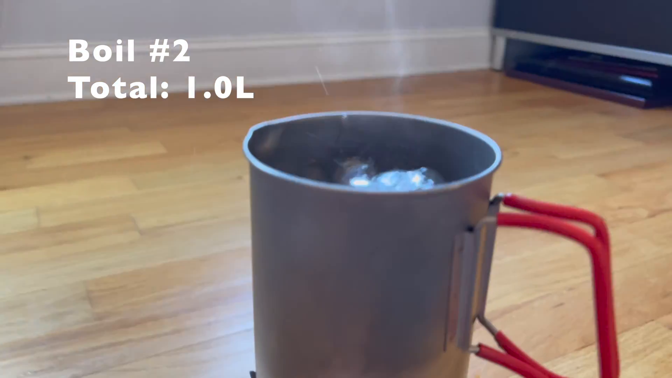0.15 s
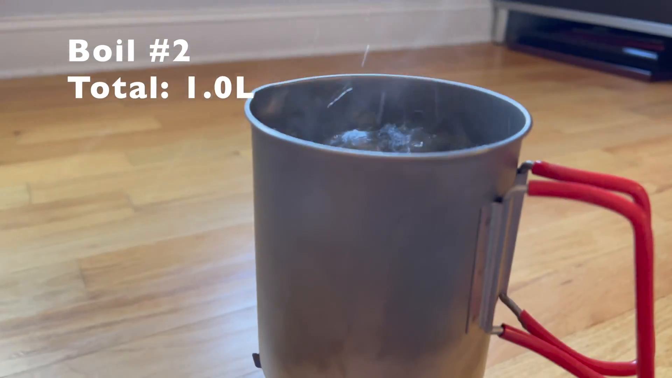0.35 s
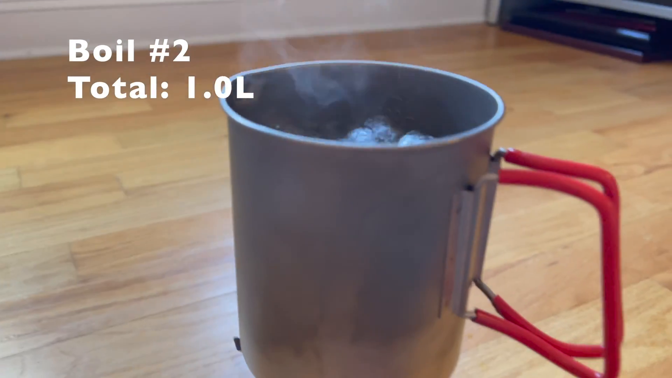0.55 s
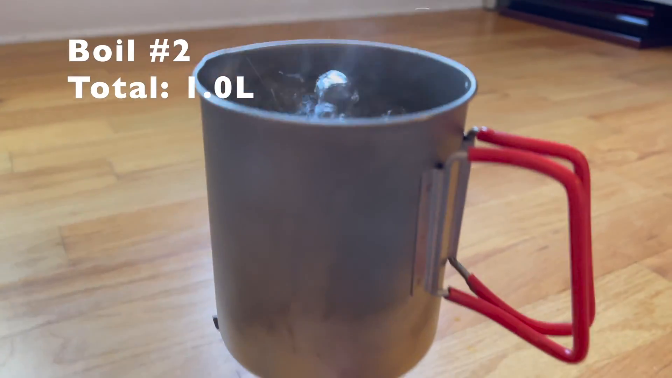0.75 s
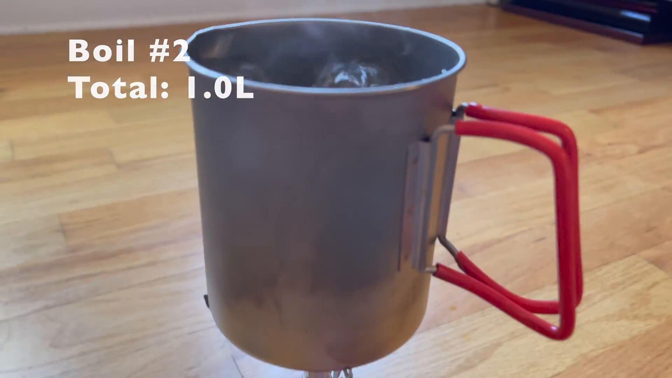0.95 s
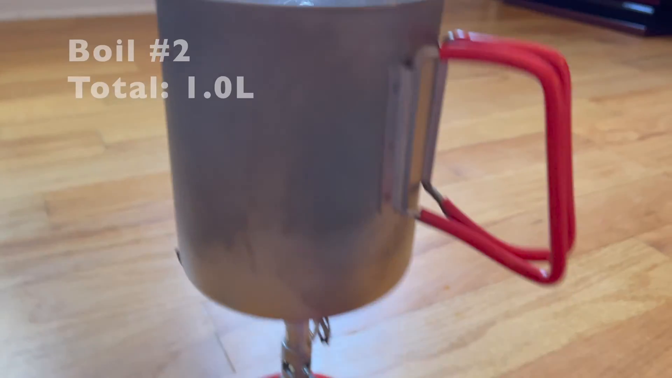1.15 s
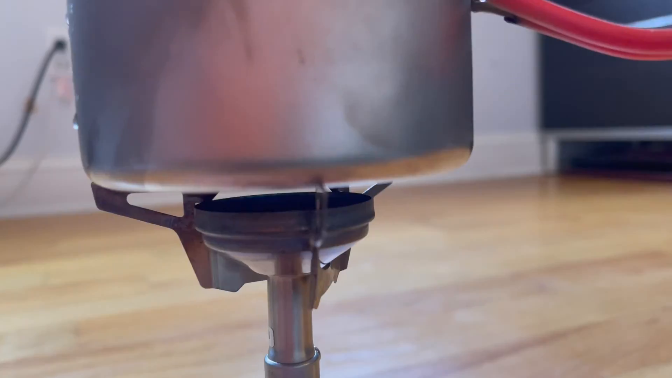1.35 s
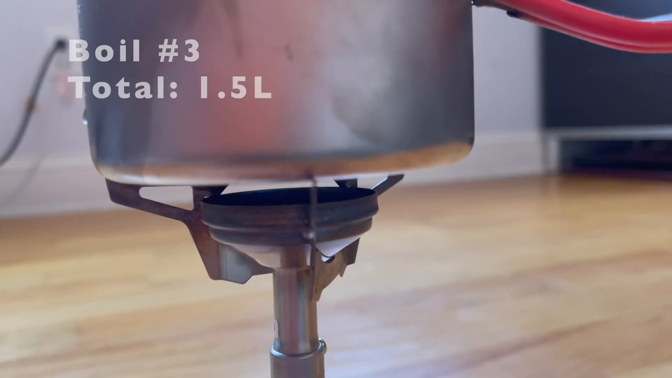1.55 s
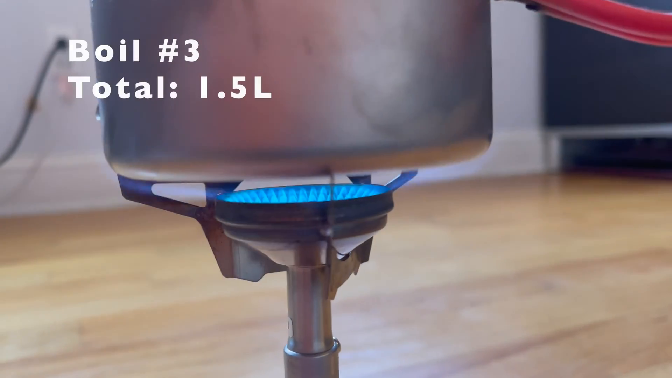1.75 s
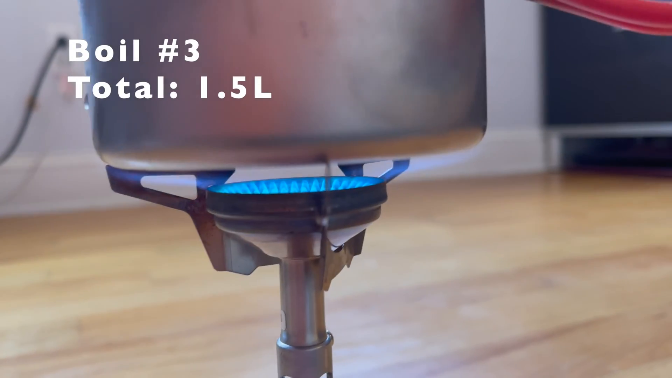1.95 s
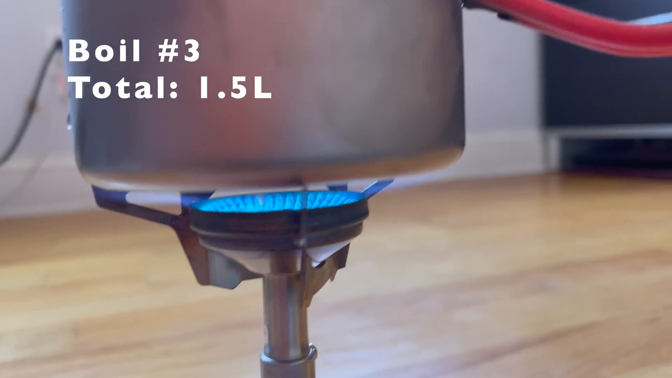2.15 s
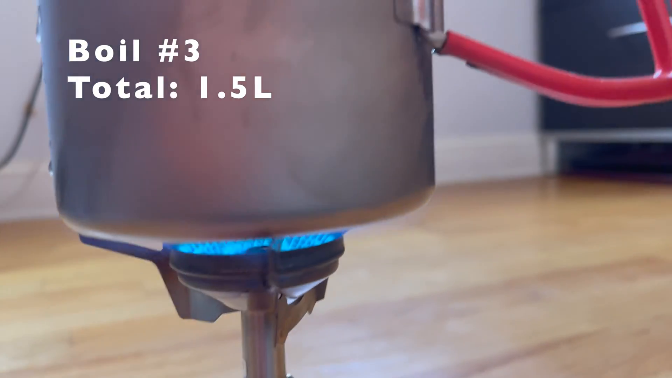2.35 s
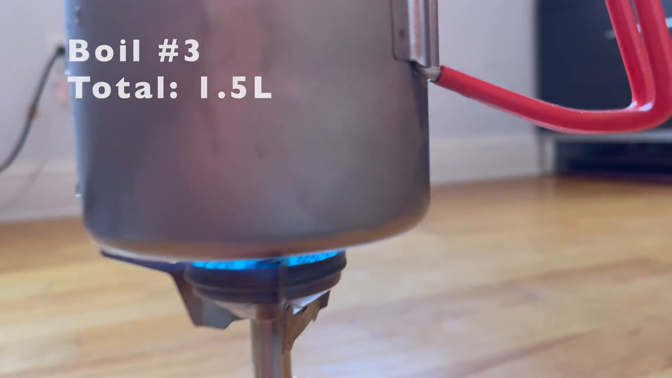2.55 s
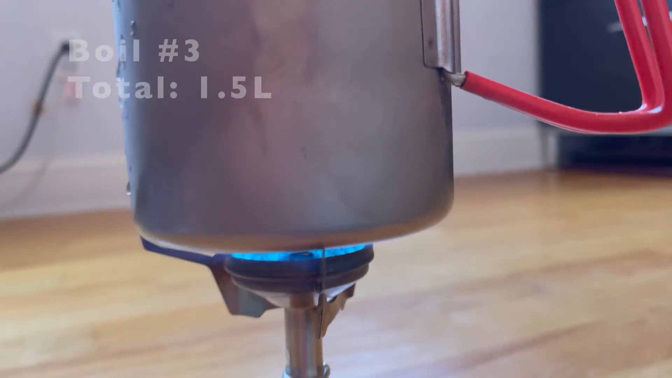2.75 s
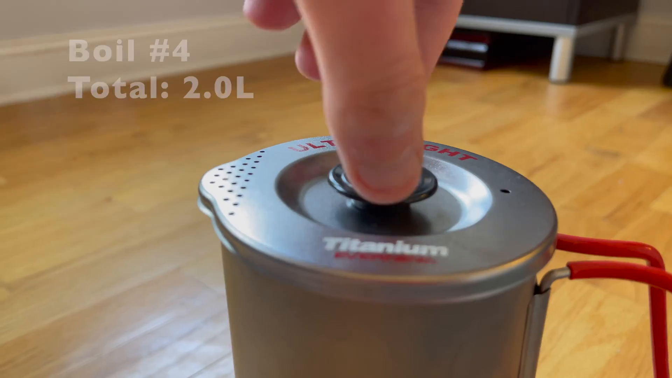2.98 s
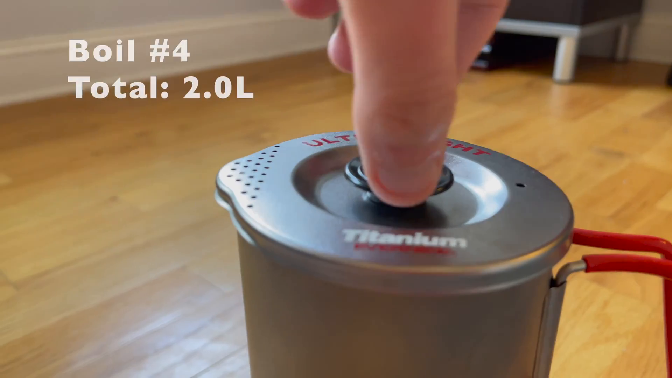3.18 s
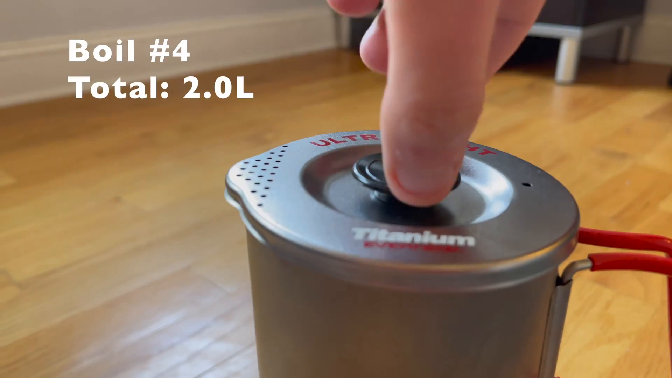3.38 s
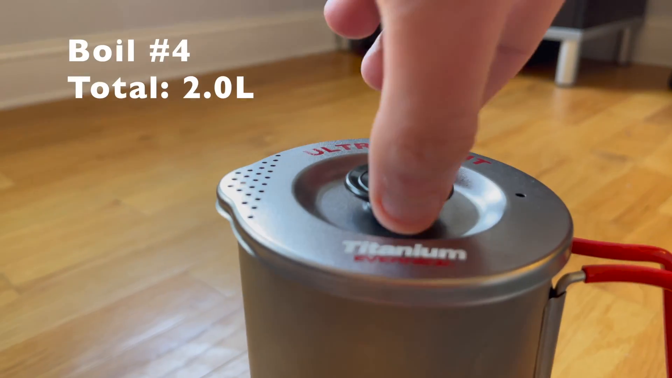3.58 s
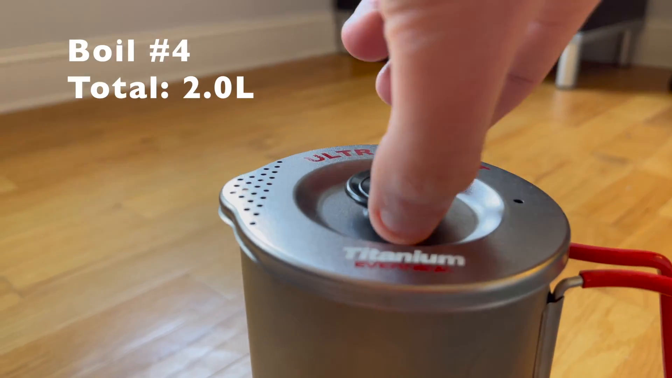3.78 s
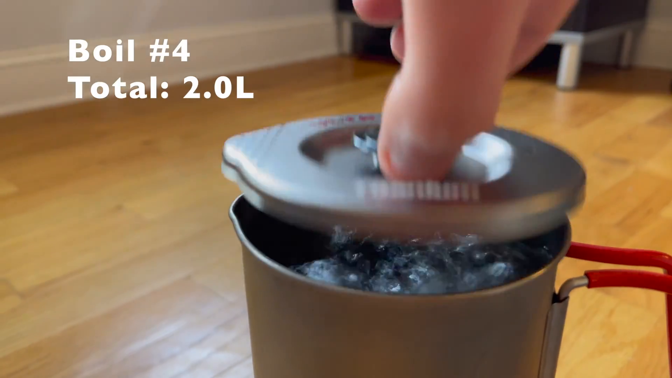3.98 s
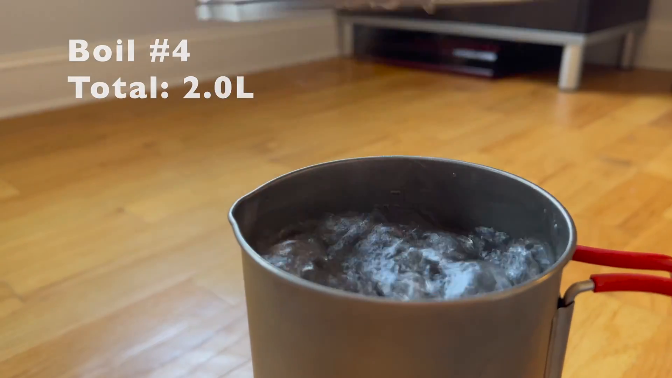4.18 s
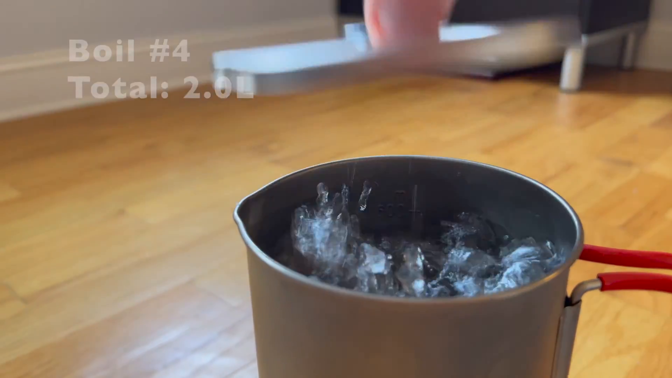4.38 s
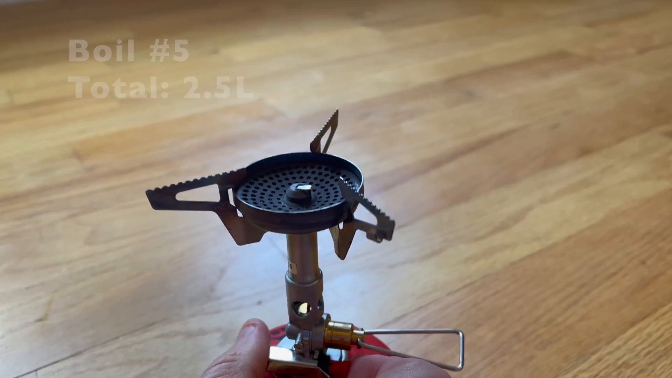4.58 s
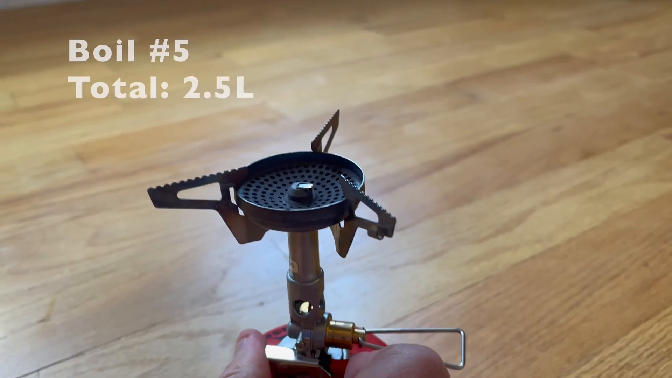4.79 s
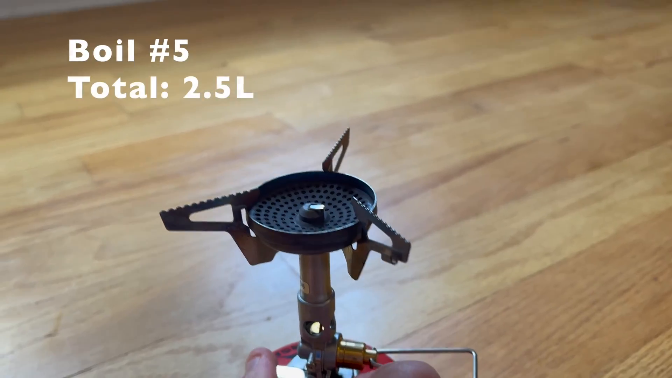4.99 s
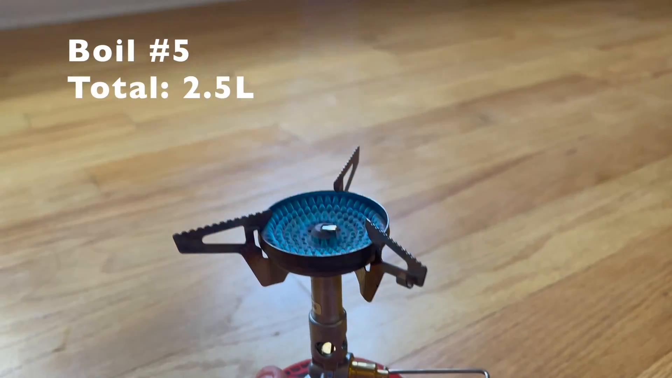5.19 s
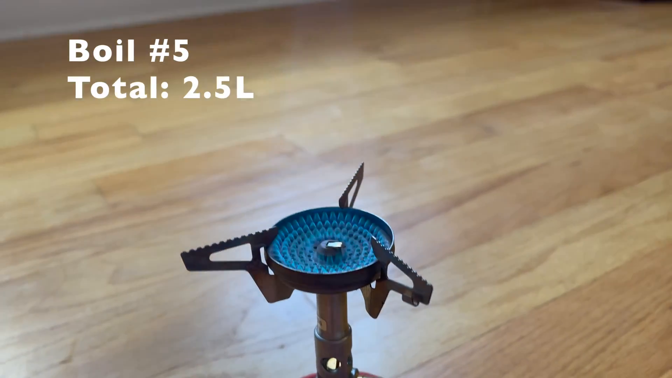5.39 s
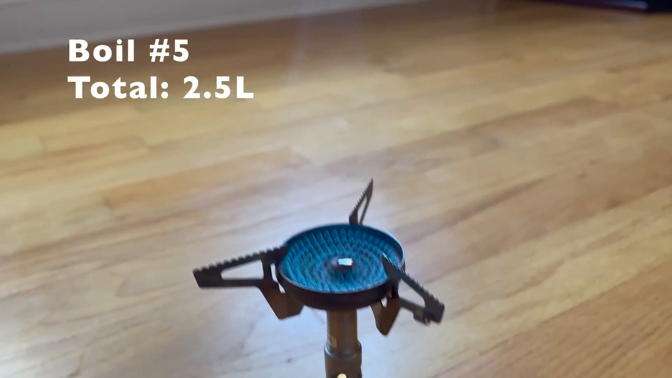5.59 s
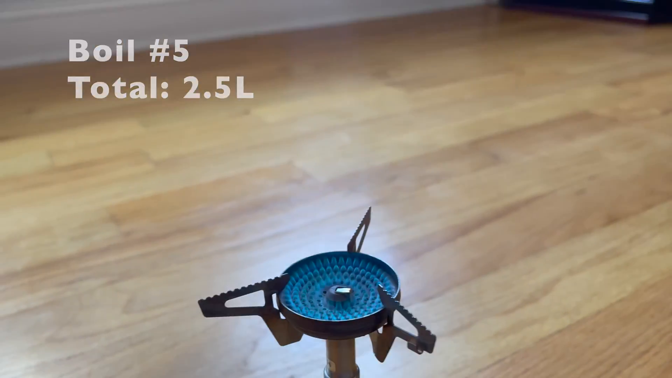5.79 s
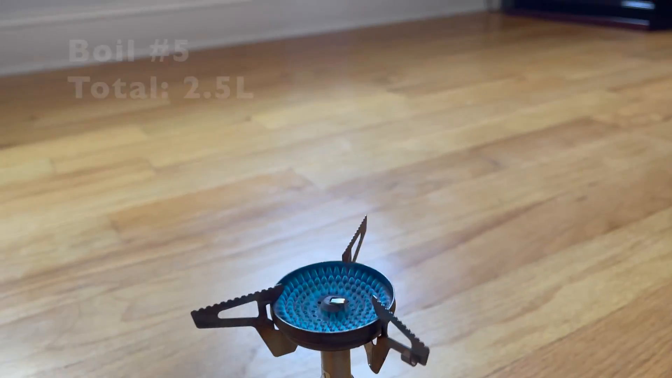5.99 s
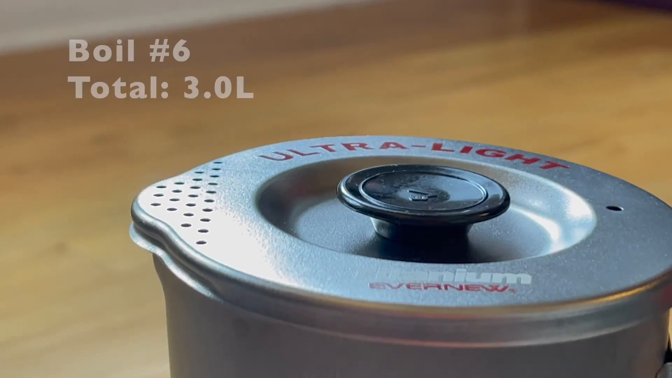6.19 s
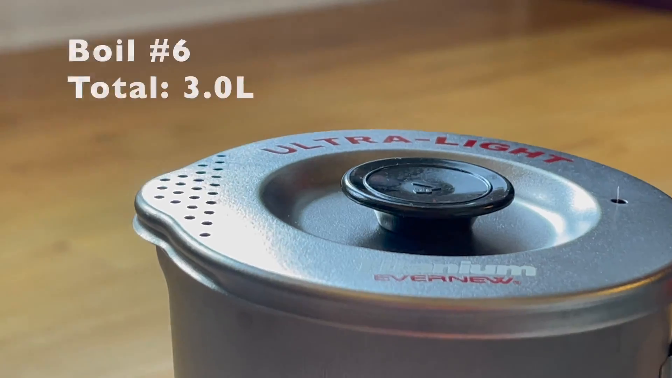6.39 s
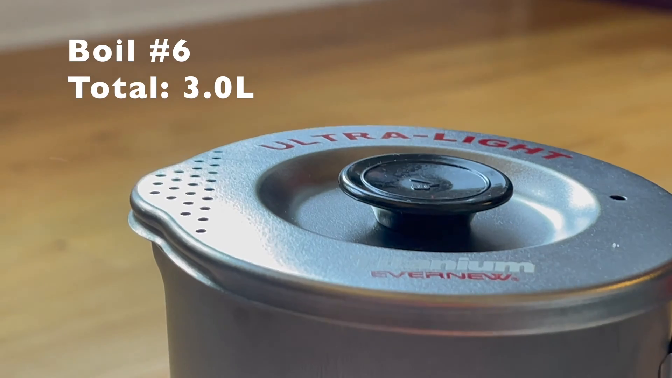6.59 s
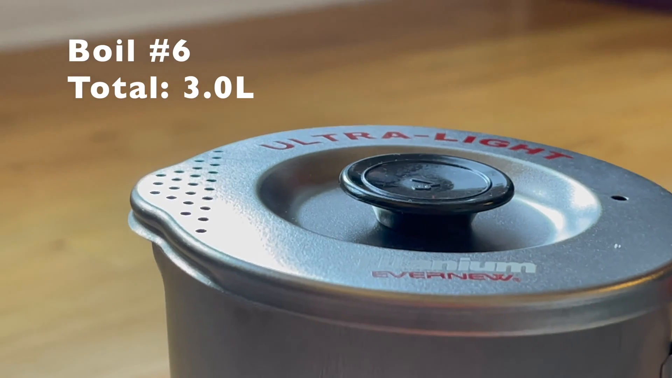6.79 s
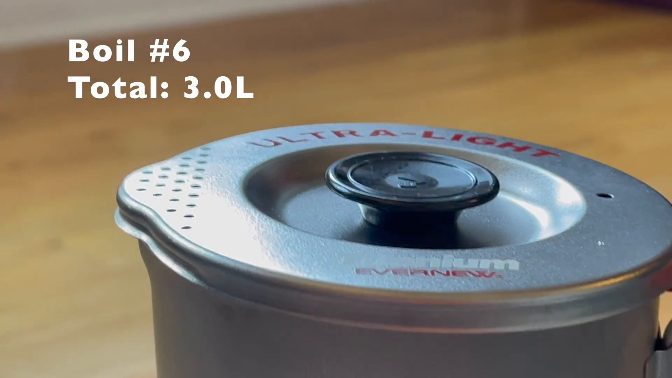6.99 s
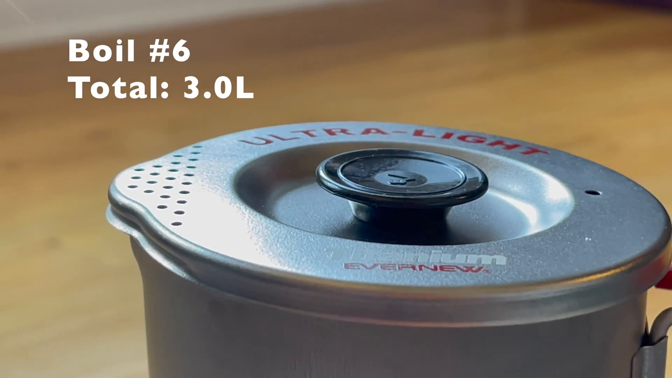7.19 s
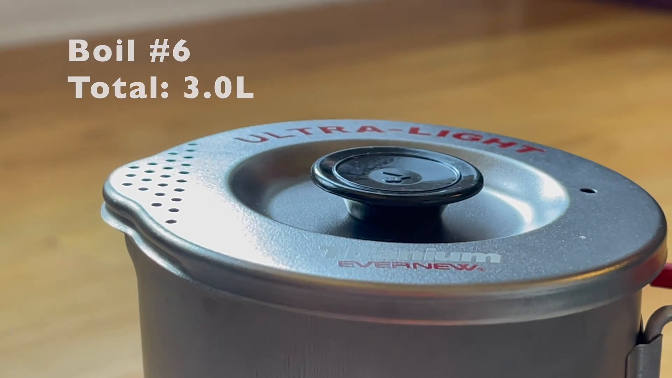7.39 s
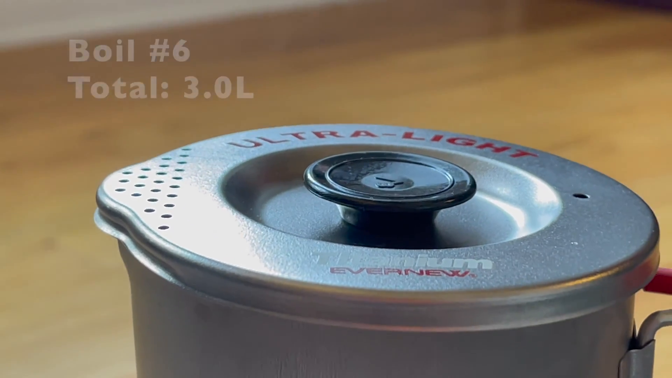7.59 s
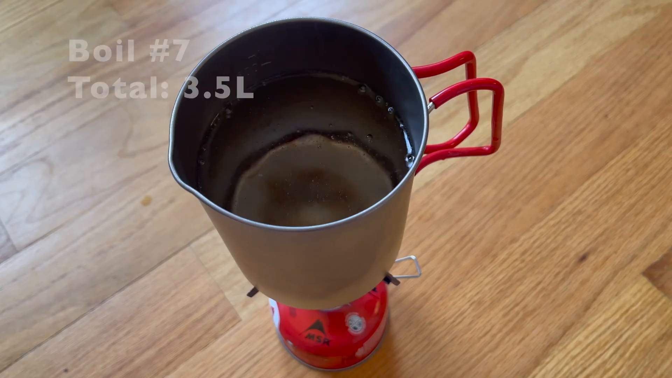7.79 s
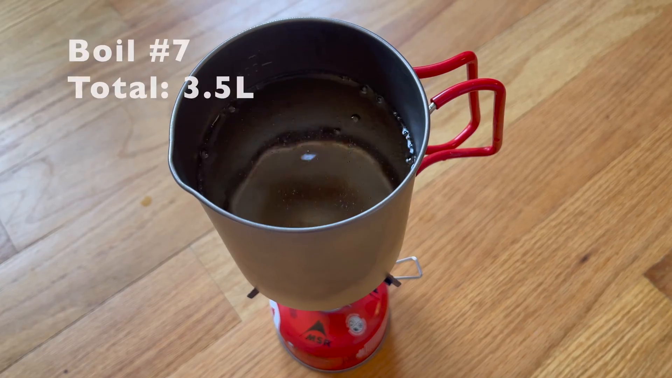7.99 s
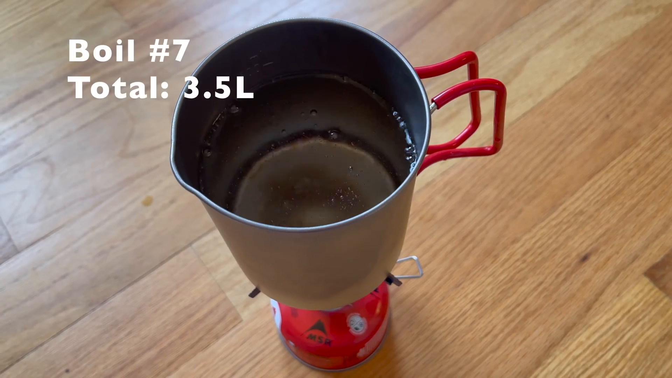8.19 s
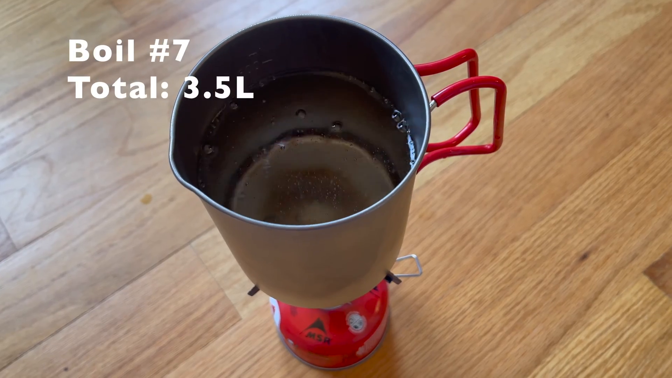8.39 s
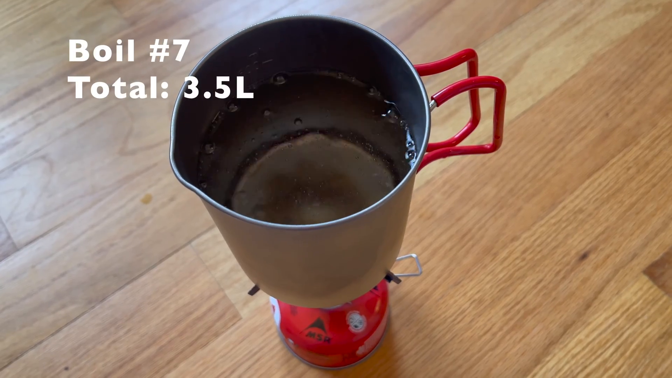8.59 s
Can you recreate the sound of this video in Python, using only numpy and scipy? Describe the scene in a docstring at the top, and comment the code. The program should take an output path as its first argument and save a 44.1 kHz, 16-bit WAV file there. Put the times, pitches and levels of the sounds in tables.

```python
"""A canister stove on a wooden floor indoors, in six short shots cut together.
Water boils over a rumbling flame while a metal ring dies away; gas hisses under a pot until the igniter
snaps and it catches with a whump; a rolling boil splashes; a bare burner lights; two more boils follow.
Flame and gas are coloured noise, bubbles and struck metal are decaying tones, snaps are coloured clicks
answered by the room."""
import sys
import numpy as np
from scipy import signal
from scipy.fft import rfft, irfft, next_fast_len
from scipy.io import wavfile

SR = 44100
rng = np.random.default_rng(int(sys.argv[2]) if len(sys.argv) > 2 else 0)


def int16_out(signal):
    """Quantize to a 16-bit WAV file."""
    q = np.round(np.clip(np.atleast_2d(signal).T, -1, 1) * 32767)
    wavfile.write(sys.argv[1], SR, q.astype(np.int16))


N = 381465
TIME = np.arange(N) / SR
SIZE = 2 * next_fast_len(N // 2 + 8192, real=True)
FREQS = np.maximum(np.arange(SIZE // 2 + 1) * SR / SIZE, 1)

# Levels are relative: later gains and filters apply.
# Room rumble: f/Hz, level/dB per Hz
ROOM_FLOOR = [(20, -93), (55, -79.5), (110, -79), (170, -86.5), (250, -90), (450, -104), (2000, -115)]
# Mains hum: f/Hz, level/dB
HUM = [(59.5, -57.5), (119, -70)]
# Side against mid (general, lidded pot, burner seen close): f/Hz, level/dB
SPREAD = [(60, -21), (200, -18), (450, -8), (900, -3), (1700, 0), (3200, -0.5), (5000, -3.5), (6300, -8),
          (7300, -0.5), (8400, -8), (10000, -50)]
LIDDED_SPREAD = [(60, -23), (200, -21.5), (500, -12), (1500, -5.5), (2400, -21), (3300, -10), (4500, -40),
                 (6000, -56)]
BURNER_SPREAD = [(60, -29), (200, -16.5), (450, -10), (1000, -6), (2000, -5.5), (3200, 2), (4800, -20),
                 (6200, -11), (7300, 2), (8400, -14), (10000, -39)]
# Overall tone of the sound, a bright peak near 11 kHz, little above 13 kHz: f/Hz, level/dB
OVERALL_TONE = [(20, -28), (48, -0.5), (9500, -0.5), (10300, 1), (11100, 6.5), (11900, -0.5), (12900, -4.5),
                (13500, -26), (16000, -24)]
CUTOFF_HZ = 15800
SWELL_S, SWELL_DEPTH_DB = 0.25, 23.5   # boil and room tone swell in

# Modes of ringing thin metal: f/Hz, level/dB, t60/s
METAL_MODES = [(1460, -42, .2), (1600, -43, .2), (1720, -41, .22), (2440, -41, .26), (2850, -45, .2),
               (3343, -39, .2), (3435, -36, .28), (3600, -37, .33), (3720, -39, .28), (3951, -39, .24),
               (4280, -36, .32), (4500, -38, .15), (4840, -42, .5), (5410, -41, .48), (5560, -38, .27),
               (5635, -40, .4), (5819, -37.5, .56), (6105, -38, .48), (6700, -41, .36), (7950, -47, .4),
               (8270, -33, .27), (8915, -39, .37), (9254, -41, .32), (9570, -42, .42), (12400, -42, .2)]
# Its crowded weak modes: f/Hz, level/dB per Hz
METAL_WASH = [(300, -82), (1100, -81), (1700, -73), (2400, -71), (2900, -76), (3600, -64), (4300, -64),
              (5000, -69), (5600, -64.5), (6400, -66), (7300, -70), (8400, -68), (9300, -70), (11000, -74),
              (13000, -70)]
CROWD_LOW_HZ, CROWD_HIGH_HZ, CROWD_T60_S, CROWD_T60_SCATTER = 400, 13000, .41, .15

# Igniter hammer, button springing back, lid under the finger, pot ticks, dull pot knock:
# t/s, level/dB, room/dB
SNAPS = [(1.5836, 2, -35), (5.028, 1, -28)]
RELEASES = [(1.8644, -12, -37), (5.1871, -14.5, -35)]
LID_CLICKS = [(3.7612, -8.5, -42)]
TICKS = [(4.159, -28, -37), (4.303, -25, -37)]
KNOCKS = [(1.3474, -22, -37.5)]
# Click colours (snap and release: under the pot, then bare): f/Hz, level/dB
SNAP_COLOUR = [(100, -27.5), (280, -1), (800, -20), (1300, -9.5), (1900, -19.5), (2450, -11), (3000, -19),
               (3700, -15.5), (5100, -8), (6000, -12), (7200, -5), (8500, 0), (9600, -5), (10600, -2),
               (12000, -9.5), (15000, 3.5)]
BARE_SNAP_COLOUR = [(100, -16), (300, 0), (700, -16), (1200, -8), (1950, -33), (2500, -8), (3700, -21),
                    (4950, -7), (6000, -16), (7300, -5), (8200, 4.5), (8900, 3), (9700, -4), (11000, -3),
                    (15000, 5)]
RELEASE_COLOUR = [(200, -6), (800, -12), (1900, -22), (2500, -10), (3600, -13), (4400, -6), (5000, -20),
                  (6100, -10), (7300, -18), (9400, 2.5), (11300, -6), (13000, -11)]
BARE_RELEASE_COLOUR = [(200, -14), (1000, -15), (1700, -19), (2850, -8), (3900, -18), (5200, -18.5),
                       (6300, -15), (7200, -2), (9200, -6), (10300, -10), (11200, -11), (15000, -12.5)]
LID_COLOUR = [(60, -3), (190, 13), (480, -2), (750, 0), (1000, 9.5), (1500, -4), (2400, -8), (2900, 4),
              (3400, 12), (4600, -12), (5500, -5), (6800, -9), (8800, -14), (11000, .5), (12300, -13),
              (15000, -7)]
TICK_COLOUR = [(150, -11), (1000, 2), (2400, -4), (3400, 2), (4600, -4), (8800, -6), (10500, -2),
               (15000, -4)]
KNOCK_COLOUR = [(200, -10), (1200, 1), (2200, -2), (3300, 4), (3900, -5), (4500, -25), (15000, -32)]
# Colour of the room's answer: f/Hz, level/dB
ROOM_COLOUR = [(200, -6), (1000, -0.5), (3000, 1), (5000, 0), (8500, 2), (12000, -3.5)]
ROOM_EVENNESS = 0.45   # share of a click's colour evened out, as the room hears it from all sides
REFLECTIONS_PER_S, REFLECTION_SCATTER_DB = 330, 4
# Stove modes jolted by snaps (pot, bare arms) and releases (under pot, bare): f/Hz, level/dB, t60/s
POT_MODES = [(2270, -37.5, 0.18), (2500, -41.5, 0.25), (2580, -43, 0.24), (3000, -43, 0.17)]
ARM_MODES = [(1070, -28.5, 0.018), (1360, -35.5, .06), (5020, -22, 0.017)]
BUTTON_MODES = [(2450, -51, .18), (4230, -46, .16), (4420, -49, .14)]
BARE_BUTTON_MODES = [(1000, -44, .03), (2850, -44, 0.031)]

# Burner resonances: start/s, end/s, f/Hz, glide/(Hz/s), width/Hz, width doublings/(1/s),
# level/dB, fade/(dB/s)
WHISTLES = [(1.368, 2.895, 4090, -70.5, 140, 1.6, -62, 4.5), (1.3, 2.895, 6690, 381, 220, 1.2, -70.5, -3.5),
            (1.37, 1.6, 8050, -1, 440, 0.21, -63, 0), (4.54, 5.028, 3780, 2, 1400, 0.1, -62, 0),
            (5.198, 6.067, 3900, -29, 131, 0, -67, 1)]
# Lighting shots: start/s, end/s, pan/dB, flame catches/s, flame/dB, hiss rise once lit/dB, mid rush/dB
LIGHT_SHOTS = [(1.366, 2.891, -3.5, 1.6, -36.5, 1, -74), (4.535, 6.062, -3, 5.04, -40.5, 3.5, -55)]
# Gas hiss under the pot and from the bare burner: f/Hz, level/dB per Hz
JET_UNDER_POT = [(150, -86), (270, -81.5), (550, -93), (1200, -99), (2100, -102), (2500, -100),
                 (3500, -102.5), (4400, -99.5), (5100, -105), (6100, -105.5), (7000, -101), (7800, -99),
                 (8700, -90), (9400, -97), (10800, -91.5), (14000, -100)]
JET_BARE = [(150, -103), (500, -102), (1200, -99), (1800, -103), (2700, -100), (3500, -105.5), (4700, -103),
            (5500, -105), (7000, -105.5), (7900, -97.5), (9300, -100), (10600, -95), (14000, -94.5)]
# Flame freshly lit and under a hot pot: f/Hz, level/dB per Hz
FRESH_FLAME = [(20, -33), (43, -11), (65, -6.5), (86, 3.5), (125, -3), (245, -4.5), (340, -9.5), (410, -9),
               (520, -14), (720, -25), (1050, -28), (1600, -38), (5000, -94)]
HOT_FLAME = [(20, -23), (45, -8), (70, -7.5), (115, 2.5), (190, -3), (260, -2), (350, -6.5), (410, -6.5),
             (520, -18), (800, -21), (2000, -38), (6000, -91)]
FLARE_DB, FLARE_T60_S, FLARE_LOW_HZ, FLARE_HIGH_HZ = -40.5, 0.28, 400, 2100
# Pressure swings of the flame front: t/s, level/dB, length/s
PUFFS = [(1.5858, -21, .0008), (1.5962, -12.5, .0006), (1.6015, -5.8, .0012), (1.617, -19, .002),
         (5.0445, -15.5, .002), (5.0915, -22, .003)]
# Gas catching: t/s, turbulence/dB, turbulence t60/s, top f/Hz, boom start/s
WHUMPS = [(1.598, -12.5, 0.078, 2000, 1.6), (5.043, -24.5, 0.29, 258, 5.0445)]
# Room modes: f/Hz, t60/s, level under the pot/dB, level bare/dB
BOOM_MODES = [(62, 0.16, -8, -12.5), (88.5, 0.2, -40, -24), (107, 0.24, -30, -25), (133, 0.14, -15.5, -27),
              (189, 0.085, -17, -35), (240.6, 0.093, -11.5, -32), (340, 0.09, -30, -41),
              (526, 0.11, -28, -56), (634, 0.11, -27.5, -56)]
# Turbulence of the catching gas: f/Hz, level/dB
WHUMP_COLOUR = [(20, -21), (60, 1), (110, -2), (190, -2.5), (260, -4), (380, -17.5), (580, -11.5),
                (800, -30), (2000, -27), (6000, -73)]

# Swarms of big bubbles: t/s, length/s, level/dB, f/Hz
GURGLES = [(.165, .04, -49, 720), (.265, .035, -45, 1000), (.785, .075, -45, 1050), (3.075, .04, -44, 1050),
           (3.15, .1, -41, 900), (3.79, .035, -43, 830), (3.85, .06, -45, 800), (7.64, .06, -45, 950)]
GURGLE_OCTAVES = .45   # pitch spread either way
# Water thrown up by the rolling boil: t/s, level/dB
SPLASHES = [(3.272, -44), (4.084, -42), (4.212, -44), (4.303, -38), (4.374, -44)]
# Falling drops: f/Hz, level/dB
SPLASH_COLOUR = [(1400, -1), (2300, 3), (3500, -8), (6000, -11)]
SPLASH_T60_S = 0.15
# Biggest bubbles bursting: t/s, level/dB, f/Hz
PLOPS = [(0.619, -34, 3260), (0.801, -32, 3180), (0.826, -32, 3200), (0.839, -31, 1020), (0.965, -31, 1660),
         (3.182, -19, 910), (3.268, -24.5, 633), (3.459, -26, 920), (3.914, -30, 1390), (3.99, -30, 1370),
         (4.067, -22.5, 706), (4.086, -27, 2180), (4.184, -32, 660), (4.303, -29, 2300), (4.377, -30, 1480),
         (6.077, -30, 800), (6.194, -27, 920), (6.91, -35, 1630), (7.054, -35, 990), (7.218, -34, 2930),
         (7.358, -24.5, 1000), (7.537, -24.5, 1000), (7.652, -32.5, 870), (7.689, -29, 1020),
         (8.008, -30, 810), (8.165, -31.5, 730), (8.27, -37, 1380)]
POT_AIR_LOW_HZ, POT_AIR_HIGH_HZ = 1290, 1580   # resonance of the air above the water
BURSTS_PER_S, BURST_LOW_HZ, BURST_HIGH_HZ = 20, 565, 3800
BURST_OVER_WATER_DB, BURST_DB_PER_OCTAVE, BURST_SCATTER_DB = 0.5, -2, 1.5   # first: at the lowest pitch
# Rim hides the water, or the lid is off: start/s, end/s, water change/dB, fizz change/dB
EXPOSURES = [(1.16, 1.5, -3, -1.5), (4.102, 4.453, -1, 2.5)]
EXPOSURE_S = 0.28   # time taken to cover or uncover
# Echoes off the pot's wall and the floor: delay/s, level/dB
NEAR_ECHOES = [(0.0019, -22.5), (0.0047, -17)]
# Boiling shots: start/s, end/s, pan/dB, stereo width/(0-1), bubbles/(1/s), flame/dB, water/dB, fizz/dB
BOIL_SHOTS = [(0, 1.362, 2.5, 0.75, 1540, -39.5, -44, -49.5),
              (2.895, 4.535, 2.5, 0.78, 1090, -38, -42.5, -46),
              (6.064, 7.705, 3, 0.79, 1000, -40.5, -46, -49), (7.708, 8.7, 2, 0.76, 920, -42, -48, -54)]
# Water colour in each boil: f/Hz, level/dB per Hz
OPEN_POT = [(250, 2.5), (500, 7.5), (820, -1.5), (1100, 3.5), (1500, -3), (1950, -6.5), (2350, -4),
            (3200, -12), (4000, -11), (4800, -16.5), (7500, -13.5), (9500, -15), (11500, -14.5),
            (15000, -28)]
ROLLING = [(250, -12), (550, 6.5), (820, 3), (1000, 5), (1230, -2.5), (1480, 0.5), (1800, -13), (2250, -5),
           (2800, -10.5), (3900, -13.5), (4700, -20), (5600, -17), (6500, -20), (9200, -13), (10200, -13),
           (15000, -19)]
LIDDED = [(250, -2.5), (500, 4), (720, 3), (1000, 3.5), (1500, -3.5), (2020, -13.5), (2700, -8.5),
          (3450, -18.5), (4150, -12), (4900, -20), (5400, -18), (6000, -23), (6600, -18), (7500, -19.5),
          (9900, -18), (11200, -17.5), (15000, -35)]
SIMMER = [(250, -2), (500, 4.5), (900, 2), (1300, 1.5), (1900, -12), (2450, -9.5), (3300, -18.5),
          (4200, -24), (5500, -27), (7000, -27.5), (8200, -25.5), (9000, -19.5), (11300, -20), (15000, -41)]
SURGES_PER_S, SURGE_DB, FIZZ_FOLLOWS = 14.04, 0.67, 1   # random heaving; the fizz takes this share
SPATTERS_PER_S, SPATTER_DB = 60, -16   # droplets crackling on the hot rim; level against the fizz


def from_db(db):
    """Decibels to gain."""
    return 10 ** (np.asarray(db) / 20)


def rms_one(x):
    """Scale to unit power."""
    return x / np.sqrt(np.mean(x ** 2) + 1e-20)


def response(points, hz):
    """Gain of a (Hz, dB) table at the given frequencies, interpolated over log frequency."""
    at, db = np.transpose(points)
    return from_db(np.interp(np.log(np.maximum(hz, 1)), np.log(at), db))


def colour(x, points):
    """Causal (minimum-phase) filter with the given spectrum, by folding the cepstrum."""
    size = 2 * next_fast_len(x.shape[-1] // 2 + 2048, real=True)
    hz = np.arange(size // 2 + 1) * SR / size
    cepstrum = irfft(np.log(response(points, hz)))
    cepstrum[1:size // 2] *= 2
    cepstrum[size // 2 + 1:] = 0
    minimum_phase = np.exp(rfft(cepstrum))
    return irfft(rfft(x, size) * minimum_phase)[..., :x.shape[-1]]


def band(x, low_hz, high_hz):
    """Butterworth band-pass."""
    edges_hz = [low_hz, min(high_hz, SR / 2 - 100)]
    return signal.sosfilt(signal.butter(2, edges_hz, "band", fs=SR, output="sos"), x)


def ring(x, hz, t60):
    """Two-pole resonator: a unit click sets a sine of height 1 ringing."""
    r = from_db(-60 / (t60 * SR))
    w = 2 * np.pi * hz / SR
    return signal.lfilter([0, np.sin(w)], [1, -2 * r * np.cos(w), r * r], x + 1e-18)


def decay(t, t60):
    """Silent before t = 0, then dying away by 60 dB per t60."""
    return (t >= 0) * from_db(-60 * np.maximum(t, 0) / t60)


def white(t):
    """Two unrelated noises at 0 dB per Hz."""
    return rng.standard_normal((2, len(t))) * np.sqrt(SR / 2)


def drift(t, rate):
    """Slow chance with a spread near 1: random points at the given rate, joined by lines."""
    return np.interp((t - t[0]) * rate, np.arange(6000), rng.standard_normal(6000))


def stereo(pair, pan_db=0, width=1, image=SPREAD):
    """Two unrelated signals become mid and side, the side weighted over frequency."""
    count = pair.shape[-1]
    size = 2 * next_fast_len(count // 2 + 1, real=True)
    mid, side = rfft(pair, size)
    hz = np.arange(size // 2 + 1) * SR / size
    sign = np.array([[1], [-1]])
    spread = response(image, hz)
    both = (mid + sign * width * spread * side) / np.sqrt(1 + (width * spread) ** 2)
    pan = from_db(sign * pan_db * np.minimum(spread, .5))   # weaker where the image is narrow
    return irfft(both * pan)[:, :count]


def shot(start, end, fade=.004):
    """Sample indices, times and soft equal-power edges of one stretch."""
    where = np.flatnonzero((TIME > start - fade) & (TIME < end + fade))
    t = TIME[where]
    inside = np.minimum(t - start, end - t)
    return where, t, np.sqrt(np.clip(.5 + inside / (2 * fade), 0, 1))


def bubbles(t, per_s, low_hz, high_hz, cycles, size_db, count=20):
    """Bubbles of random size ring for a few cycles, each at one of count pitches; equal power per Hz."""
    signs = rng.choice([-1, 1], (2, len(t)))
    sizes = from_db(size_db * np.minimum(rng.exponential(1, (2, len(t))), 4)) * signs
    clumping = from_db(3 * drift(t, 22))
    born = rng.random((2, len(t))) < per_s * clumping / SR
    dealt = rng.integers(0, count, len(t))   # pitch index
    total = 0
    for k, hz in enumerate(np.geomspace(low_hz, high_hz, count)):
        notes = ring(sizes * born * (dealt == k), hz, cycles / hz)
        total = total + np.sqrt(hz) * rms_one(notes)
    return rms_one(total)


def room_tone():
    """Low coloured-noise rumble and mains hum sines."""
    hum = sum(from_db(db) * np.sqrt(2) * np.sin(2 * np.pi * hz * TIME) for hz, db in HUM)
    return stereo(colour(white(TIME), ROOM_FLOOR)) + hum


def swell():
    """Gain that rises evenly in dB at the start, then holds."""
    return from_db(-SWELL_DEPTH_DB * np.clip(1 - TIME / SWELL_S, 0, 1))


def weak_modes(t, count=480):
    """A crowd of weak modes, each with its own pitch, strength and ring time."""
    spacing = (CROWD_HIGH_HZ - CROWD_LOW_HZ) / count
    pitches = CROWD_LOW_HZ + spacing * (np.arange(count) + rng.random(count))
    gains = response(METAL_WASH, pitches) * np.sqrt(spacing)
    t60s = CROWD_T60_S * np.exp(CROWD_T60_SCATTER * rng.uniform(-0.8, 1.8, count))
    strikes = rng.standard_normal((2, count)) + 1j * rng.standard_normal((2, count))
    return sum(np.real(strike[:, None] * np.exp(2j * np.pi * hz * t)) * gain * decay(t, t60)
               for hz, gain, t60, strike in zip(pitches, gains, t60s, strikes.T))


def metal_ring(waver_per_s=40, waver=0.78):
    """Thin struck metal rings out; each mode wavers, with its own phase in mid and in side."""
    where, t, edges = shot(0, .36)
    phases = rng.uniform(0, 2 * np.pi, (len(METAL_MODES), 2, 1))
    modes = 0
    for (hz, db, t60), phase in zip(METAL_MODES, phases):
        strength = from_db(db) * decay(t, t60) * (1 + waver * drift(t, waver_per_s))
        angle = 2 * np.pi * hz * t + phase + waver * drift(t, waver_per_s)
        modes = modes + strength * np.sin(angle)
    return np.pad(stereo(modes + weak_modes(t), width=1.06), [(0, 0), (0, N - len(t))])


def clicks(events, spectra, gain_db, rattle_db, rattle_t60, room_t60):
    """Hard contact and brief chatter sound through the metal; the room answers in uneven reflections."""
    out = np.zeros((2, N))
    for (at, level_db, room_db), spectrum in zip(events, spectra):
        where, t, edges = shot(at - .01, at + 0.54)
        age = t - at
        contact = np.diff(age >= 0, prepend=False) * np.array([[1], [.3]])   # mid, side
        chatter = from_db(rattle_db) * decay(age, rattle_t60) * rms_one(white(t))
        scatter = from_db(REFLECTION_SCATTER_DB * drift(t, REFLECTIONS_PER_S))
        reflections = rms_one(white(t) * scatter)
        tail = from_db(room_db) * decay(age - .003, room_t60) * reflections
        all_round = [(hz, db * (1 - ROOM_EVENNESS)) for hz, db in spectrum]
        room = colour(colour(tail, all_round), ROOM_COLOUR)
        sound = stereo(colour(contact + chatter, spectrum) + room)
        unit_energy = sound / np.sqrt(np.sum(sound ** 2))
        out[:, where] += from_db(level_db + gain_db) * unit_energy
    return out


def jolted():
    """Each snap and release jolts the stove's modes: first with the pot standing on it, then bare."""
    out = np.zeros((2, N))
    mode_sets = [POT_MODES, ARM_MODES, BUTTON_MODES, BARE_BUTTON_MODES]
    for (at, *_), modes in zip(SNAPS + RELEASES, mode_sets):
        where, t, edges = shot(at, at + .6)
        jolt = np.diff(t >= at, prepend=False)
        out[:, where] += sum(from_db(db) * ring(jolt, hz, t60) for hz, db, t60 in modes)
    return out


def whistles():
    """The jet excites burner resonances, narrow noise bands that may glide and broaden as it warms."""
    out = np.zeros((2, N))
    for start, end, hz, glide_hz_per_s, width_hz, doublings_per_s, level_db, fade_db_per_s in WHISTLES:
        where, t, edges = shot(start, end)
        age = t - start
        phase = 2 * np.pi * np.cumsum(hz + glide_hz_per_s * age) / SR
        # the wider the band, the faster it flutters
        clock = np.cumsum(width_hz * 2 ** (doublings_per_s * age)) / SR
        note = np.array([drift(clock, np.pi / 2) * np.cos(phase) + drift(clock, np.pi / 2) * np.sin(phase)
                         for _ in range(2)])
        gain = from_db(level_db - fade_db_per_s * age) * edges
        out[:, where] += gain * stereo(rms_one(note), pan_db=-3.0)
    return out


def flares():
    """From each spark the flame rushes over the burner and settles: decaying band noise."""
    out = np.zeros((2, N))
    for at, *_ in SNAPS:
        where, t, edges = shot(at, at + .5)
        rush = rms_one(band(white(t), FLARE_LOW_HZ, FLARE_HIGH_HZ))
        out[:, where] += from_db(FLARE_DB) * decay(t - at, FLARE_T60_S) * stereo(rush)
    return out


def flame(t, spectrum, flutter_db):
    """Turbulent burning: a low roar that flutters."""
    return rms_one(colour(white(t), spectrum)) * from_db(flutter_db * drift(t, 24.91))


def lighting():
    """Gas hisses through the burner as coloured noise; once lit the flame roars over it."""
    out = np.zeros((2, N))
    for row, jet in zip(LIGHT_SHOTS, [JET_UNDER_POT, JET_BARE]):
        start, end, pan_db, caught, flame_db, rise_db, rush_db = row
        where, t, edges = shot(start, end)
        lit = np.clip((t - caught) / 0.037, 0, 1)
        hiss = colour(white(t), jet) * from_db(rise_db * lit + 0.55 * drift(t, 16.0))
        settling_db = -1.5 * (t - caught - .5)   # the fresh flame calms down
        roar = from_db(flame_db + settling_db) * flame(t, FRESH_FLAME, flutter_db=1.0)
        rush = from_db(rush_db) * rms_one(band(white(t), 590, 1060))   # an uncovered flame is brighter
        out[:, where] += edges * stereo(hiss + lit * (roar + rush), pan_db, image=BURNER_SPREAD)
    return out


def whumps(rise_s=0.005):
    """Gathered gas burns at once: sharp pressure swings, booming room modes, a burst of turbulence."""
    out = np.zeros((2, N))
    for at, level_db, length in PUFFS:
        where, t, edges = shot(at - .03, at + .1)
        age = (t - at) / length
        swing = age * np.exp(.5 - .5 * age ** 2)
        out[:, where] += band(from_db(level_db) * swing, 45, 3000)
    for k, (at, turbulence_db, t60, top_hz, boom_at) in enumerate(WHUMPS):
        where, t, edges = shot(at - .03, at + .5)
        age = t - at
        push = np.diff(t >= boom_at, prepend=False)
        boom = sum(from_db(db[k]) * ring(push, hz, mode_t60) for hz, mode_t60, *db in BOOM_MODES)
        burst = np.clip(1 + age / rise_s, 0, 1) * decay(np.maximum(age, 0), t60)
        noise = stereo(rms_one(colour(white(t), WHUMP_COLOUR)), width=1.7)
        turbulence = from_db(turbulence_db) * burst * noise
        out[:, where] += boom + band(turbulence, 54, top_hz)
    return out


def gurgles():
    """Big bubbles of similar pitch surface close together."""
    out = np.zeros((2, N))
    for at, length, level_db, hz in GURGLES:
        where, t, edges = shot(at, at + length, fade=.015)
        low_hz, high_hz = hz / 2 ** GURGLE_OCTAVES, hz * 2 ** GURGLE_OCTAVES
        swarm = bubbles(t, 900, low_hz, high_hz, cycles=23, size_db=1, count=7)
        out[:, where] += from_db(level_db) * edges * stereo(swarm, pan_db=1.5)
    return out


def splashes():
    """Thrown water falls back in a short patter of ringing drops."""
    out = np.zeros((2, N))
    for at, level_db in SPLASHES:
        where, t, edges = shot(at, at + 0.18)
        drops = bubbles(t, 1500, 1330, 6900, cycles=8.9, size_db=1, count=10)
        patter = stereo(rms_one(colour(drops, SPLASH_COLOUR)), pan_db=2.0)
        out[:, where] += from_db(level_db) * decay(t - at, SPLASH_T60_S) * patter
    return out


def lesser_bursts(count=90):
    """Rows (s, dB, Hz) of bubbles bursting at random through each boil, the higher the weaker."""
    rows = []
    for start, end, *_, water_db, _ in BOIL_SHOTS:
        times = start + np.cumsum(rng.exponential(1, count)) / BURSTS_PER_S
        octaves = rng.random(count) * np.log2(BURST_HIGH_HZ / BURST_LOW_HZ)
        scatter_db = BURST_SCATTER_DB * rng.standard_normal(count)
        levels_db = water_db + BURST_OVER_WATER_DB + BURST_DB_PER_OCTAVE * octaves + scatter_db
        last = min(end, TIME[-1]) - .04
        rows += [row for row in zip(times, levels_db, BURST_LOW_HZ * 2 ** octaves) if row[0] < last]
    return rows


def plops(events, cycles, splash_db, splash_t60, air_db, glide=3, attack_s=0.00034):
    """Bubbles burst: a short note that rises, with a splash that also sounds the air in the pot."""
    out = np.zeros((2, N))
    for at, level_db, hz in events:
        where, t, edges = shot(at, at + 0.06)
        age = t - at
        note = np.sin(2 * np.pi * hz * age * (1 + glide * age)) * decay(age, cycles / hz)
        splash = from_db(splash_db) * rms_one(band(white(t), 0.69 * hz, 1.11 * hz))
        air = from_db(air_db) * rms_one(band(white(t), POT_AIR_LOW_HZ, POT_AIR_HIGH_HZ))
        onset = np.clip(age / attack_s, 0, 1)
        pair = note * np.array([[1], [0]]) + (splash + air) * decay(age, splash_t60)   # note in mid only
        out[:, where] += from_db(level_db) * onset * stereo(pair, pan_db=1.5)
    return out


def exposure(t):
    """Change of the water and the fizz in dB as the surface is hidden or uncovered."""
    return sum(np.outer([water_db, fizz_db],
                        np.clip(.5 + np.minimum(t - start, end - t) / EXPOSURE_S, 0, 1))
               for start, end, water_db, fizz_db in EXPOSURES)


def hollow(x):
    """Short echoes off the pot's wall and the floor ripple the spectrum."""
    at = np.arange(x.shape[-1])
    return x + sum(from_db(db) * np.array([np.interp(at - delay * SR, at, side, left=0) for side in x])
                   for delay, db in NEAR_ECHOES)


def boiling(split_hz=3400):
    """Flame, bubbling water and the fizz of tiny bubbles collapsing on the pot's base."""
    out = np.zeros((2, N))
    pots = [OPEN_POT, ROLLING, LIDDED, SIMMER]
    images = [SPREAD, SPREAD, LIDDED_SPREAD, SPREAD]
    for row, pot, image in zip(BOIL_SHOTS, pots, images):
        start, end, pan_db, width, per_s, flame_db, water_db, fizz_db = row
        where, t, edges = shot(start, end)
        surge_db = SURGE_DB * drift(t, SURGES_PER_S)
        open_water_db, open_fizz_db = exposure(t)
        # the room smears part of the bubbling into an even wash
        water = bubbles(t, per_s, 377.6, 3680, cycles=15, size_db=3.5) + 1.15 * rms_one(white(t))
        water = rms_one(band(colour(hollow(water), pot), 280, split_hz))
        water = from_db(water_db + surge_db + open_water_db) * water
        fizz = bubbles(t, 1.5 * per_s, 2700, 14400, cycles=13.0, size_db=3.5) + 1.84 * rms_one(white(t))
        spatter = bubbles(t, SPATTERS_PER_S, 3600, 12400, cycles=8, size_db=4.5, count=5)
        fizz = rms_one(fizz) + from_db(SPATTER_DB) * spatter
        fizz = rms_one(band(colour(fizz, pot), split_hz, 22700))
        fizz = from_db(fizz_db + FIZZ_FOLLOWS * surge_db + open_fizz_db) * fizz
        roar = from_db(flame_db) * flame(t, HOT_FLAME, flutter_db=1.65)
        out[:, where] += edges * stereo(water + fizz + roar, pan_db, width, image)
    return out


def scene():
    """All sources together."""
    snaps = clicks(SNAPS, [SNAP_COLOUR, BARE_SNAP_COLOUR],
                   gain_db=17.0, rattle_db=-9, rattle_t60=0.016, room_t60=0.35)
    releases = clicks(RELEASES, [RELEASE_COLOUR, BARE_RELEASE_COLOUR],
                      gain_db=15, rattle_db=-11, rattle_t60=.013, room_t60=0.3)
    lid = clicks(LID_CLICKS, [LID_COLOUR],
                 gain_db=16.5, rattle_db=-12, rattle_t60=.01, room_t60=.2)
    ticks = clicks(TICKS, [TICK_COLOUR] * len(TICKS),
                   gain_db=16.5, rattle_db=-12.0, rattle_t60=0.0091, room_t60=0.23)
    knocks = clicks(KNOCKS, [KNOCK_COLOUR],
                    gain_db=15, rattle_db=-21, rattle_t60=0.016, room_t60=0.14)
    metal = snaps + releases + lid + ticks + knocks + jolted() + metal_ring()
    burner = lighting() + whistles() + whumps() + flares()
    big_bursts = plops(PLOPS, cycles=20, splash_db=-9.5, splash_t60=0.035, air_db=-16)
    small_bursts = plops(lesser_bursts(), cycles=24, splash_db=-10, splash_t60=0.035, air_db=-16)
    water = boiling() + big_bursts + small_bursts + splashes()
    return swell() * (water + room_tone()) + gurgles() + burner + metal


def record(dry):
    """Overall tone peaks near 11 kHz; above 8.5 kHz the left side lags by 0.29 ms; the top is cut."""
    spectrum = rfft(colour(dry, OVERALL_TONE), SIZE)
    spectrum[0] *= np.exp(-2j * np.pi * np.maximum(FREQS - 8500, 0) * .000294)
    low_pass = signal.ellip(10, .1, 90, CUTOFF_HZ, fs=SR, output="sos")
    return signal.sosfilt(low_pass, irfft(spectrum)[:, :N])


dry = scene()
out = record(dry)
int16_out(out)
```